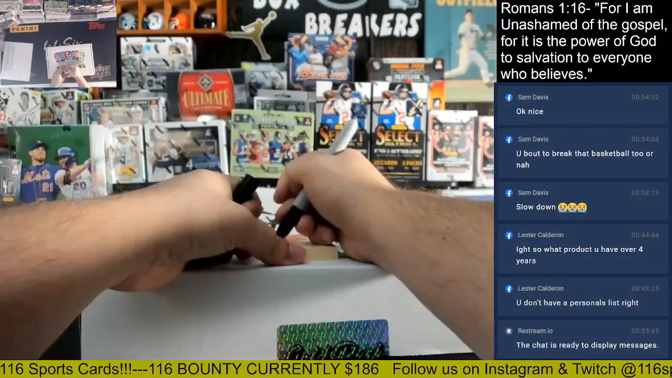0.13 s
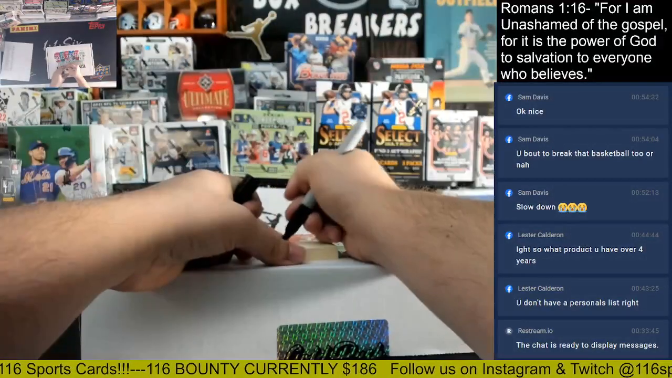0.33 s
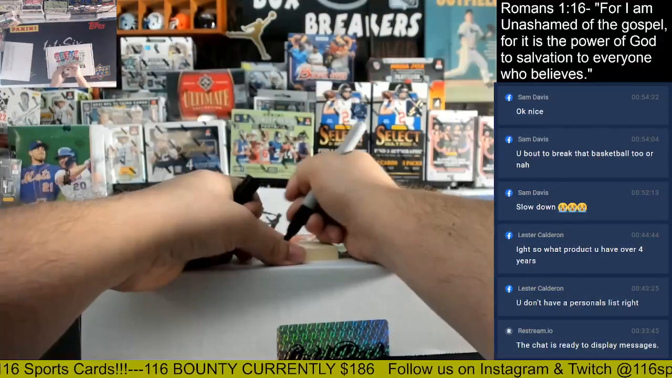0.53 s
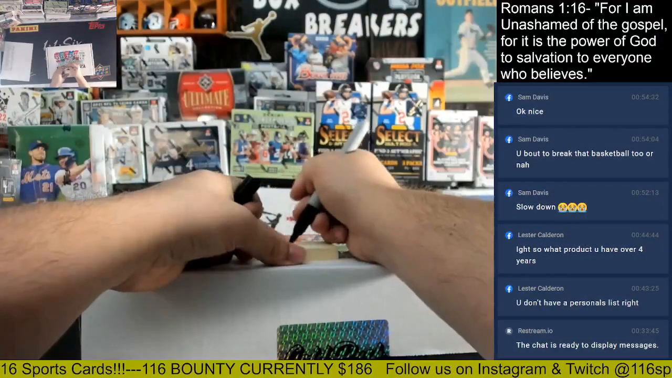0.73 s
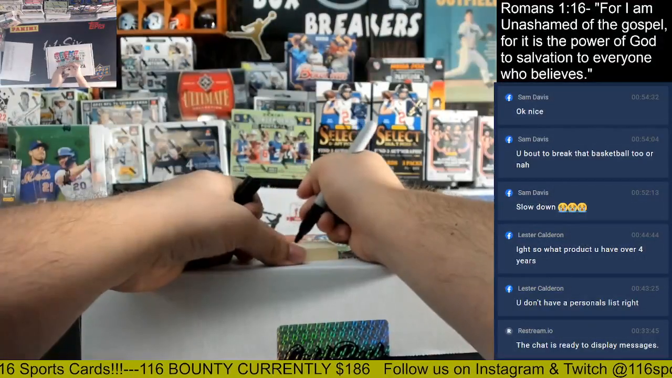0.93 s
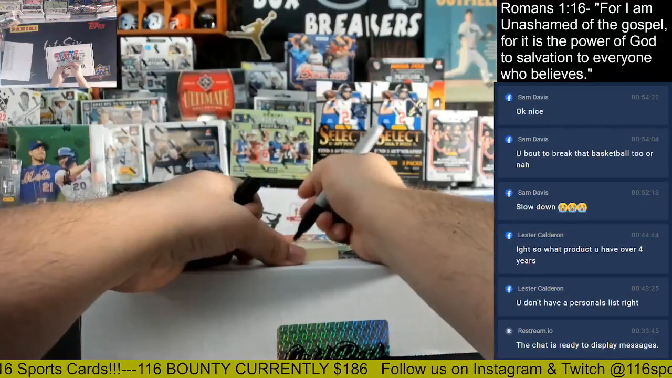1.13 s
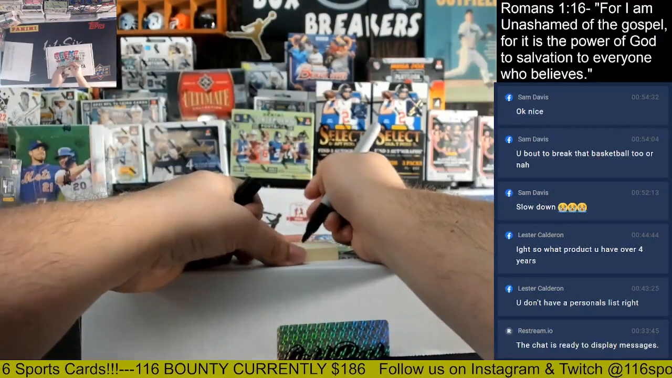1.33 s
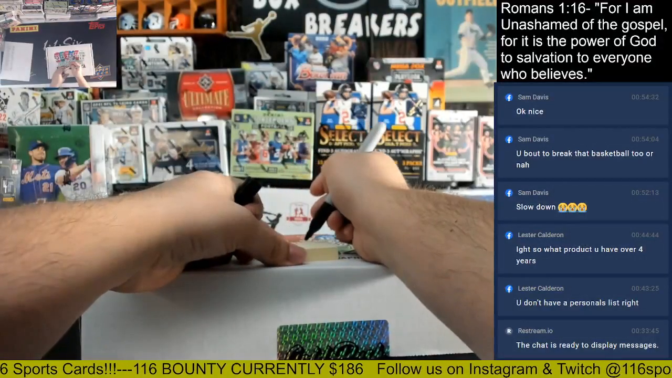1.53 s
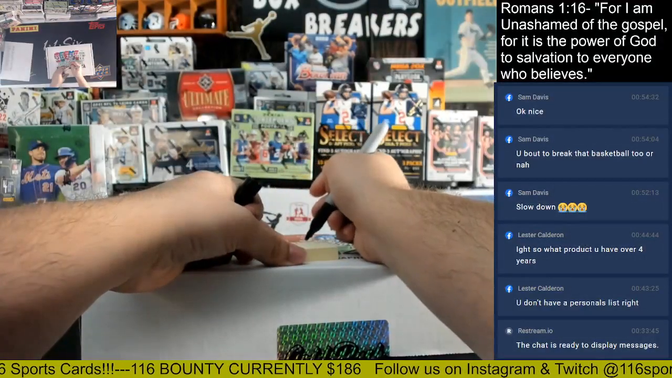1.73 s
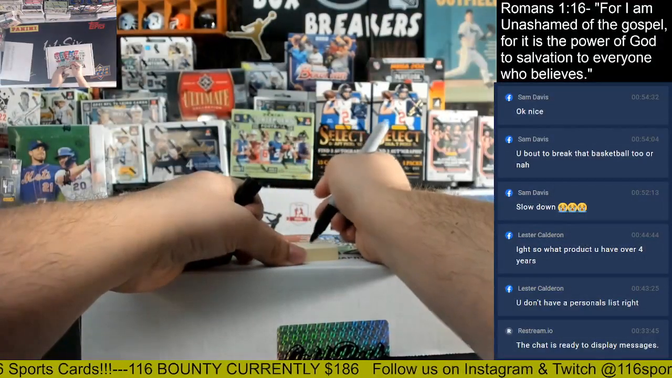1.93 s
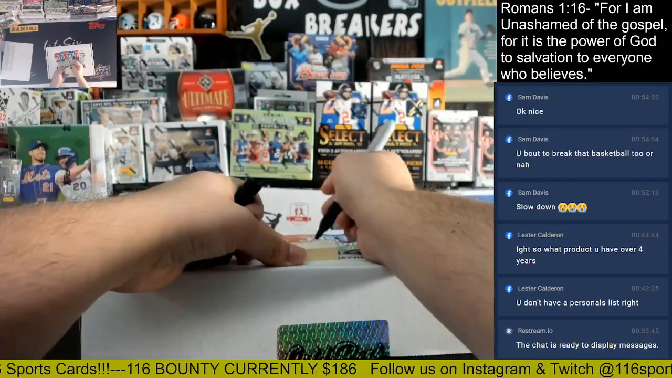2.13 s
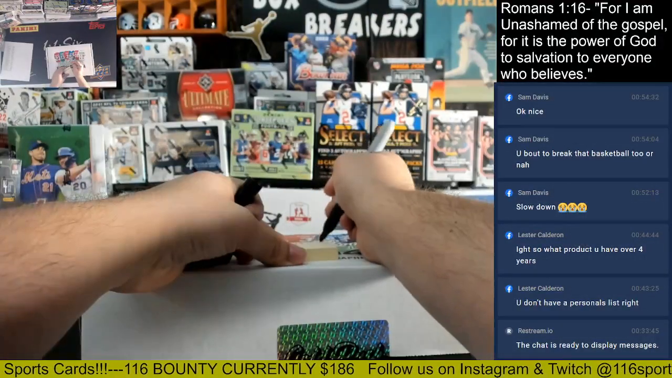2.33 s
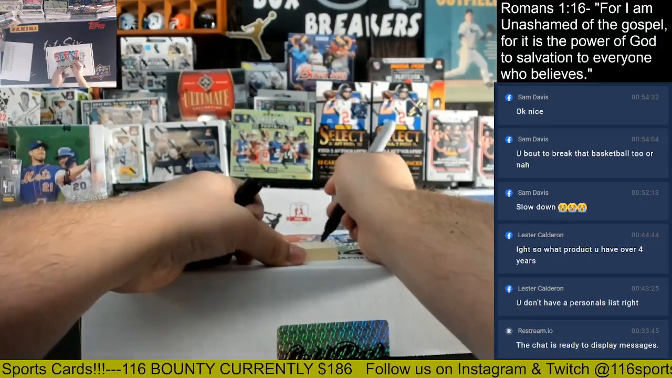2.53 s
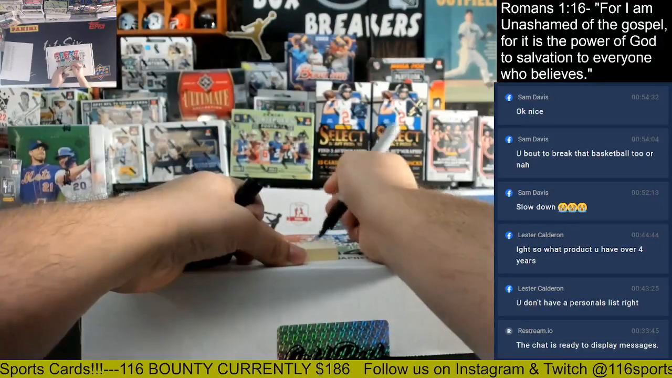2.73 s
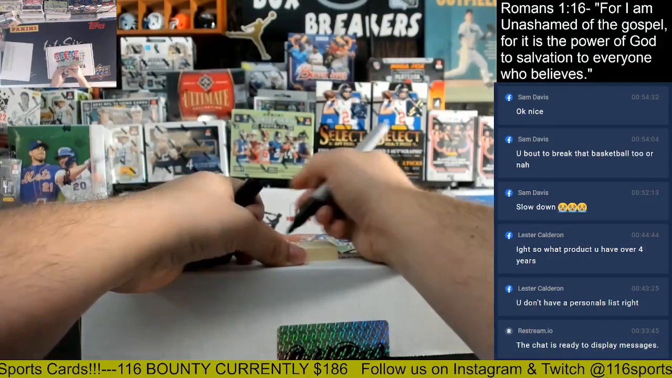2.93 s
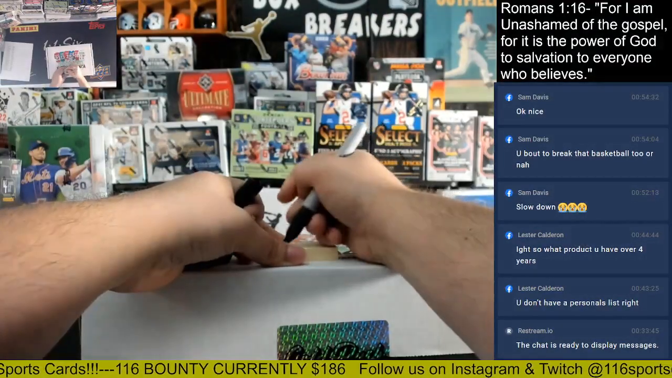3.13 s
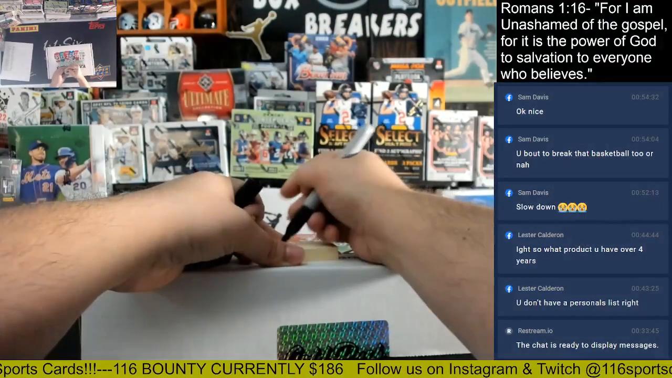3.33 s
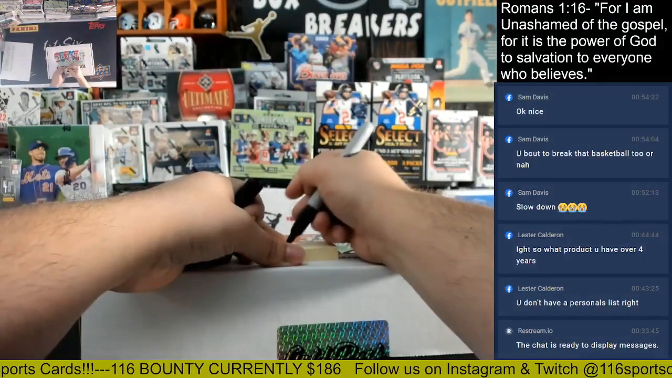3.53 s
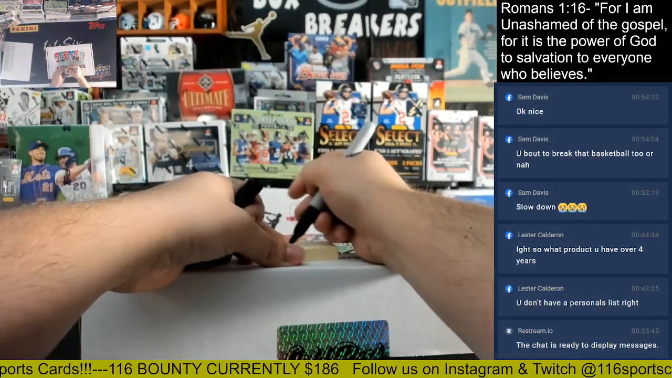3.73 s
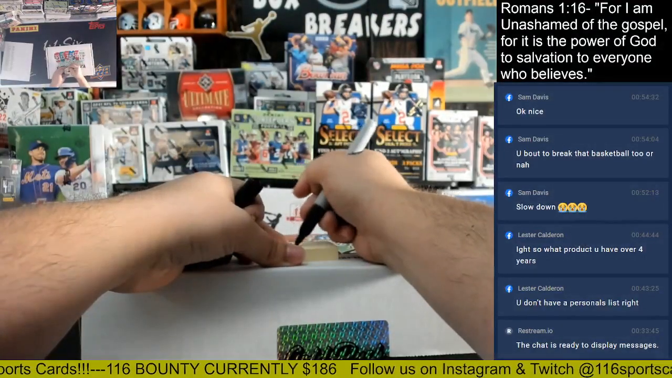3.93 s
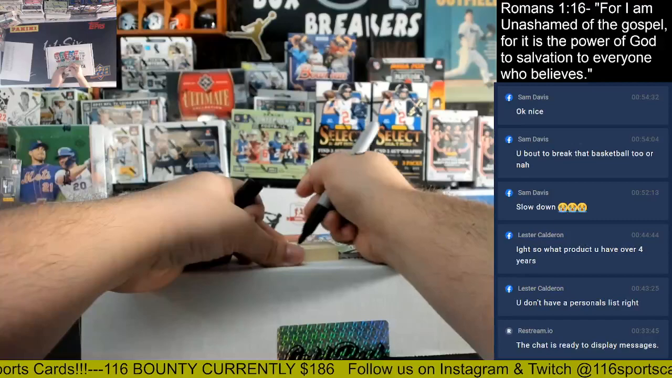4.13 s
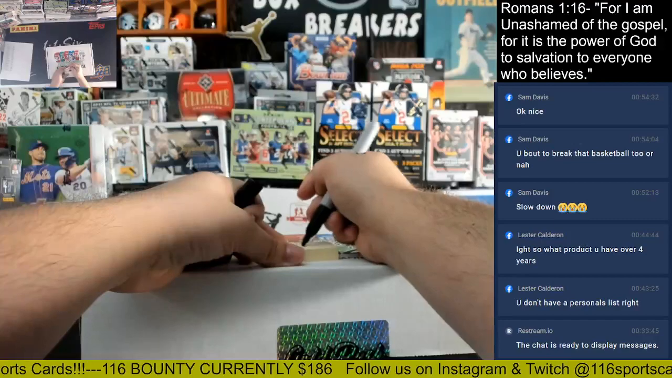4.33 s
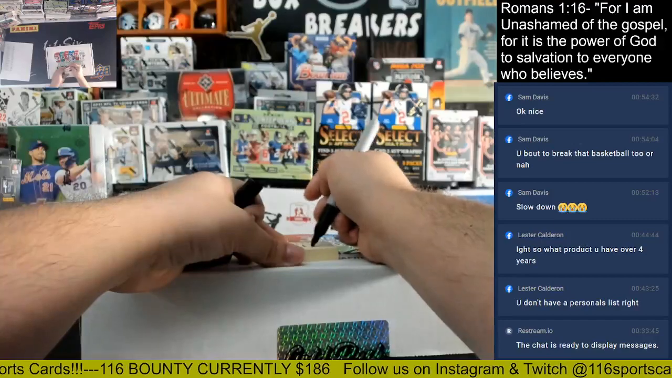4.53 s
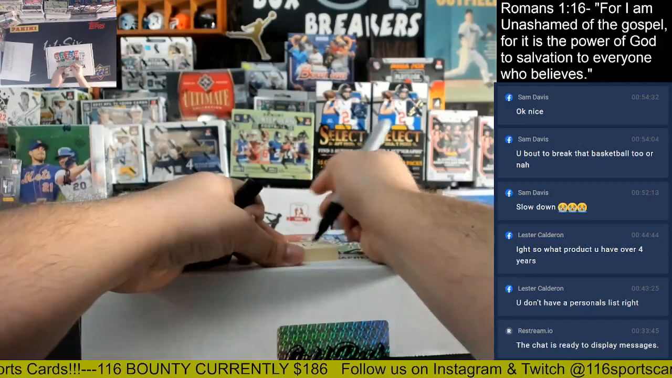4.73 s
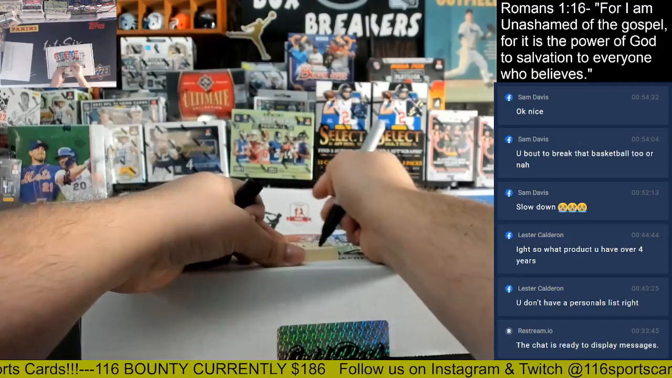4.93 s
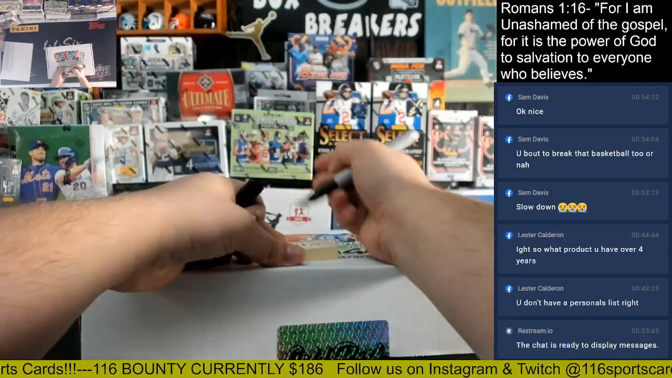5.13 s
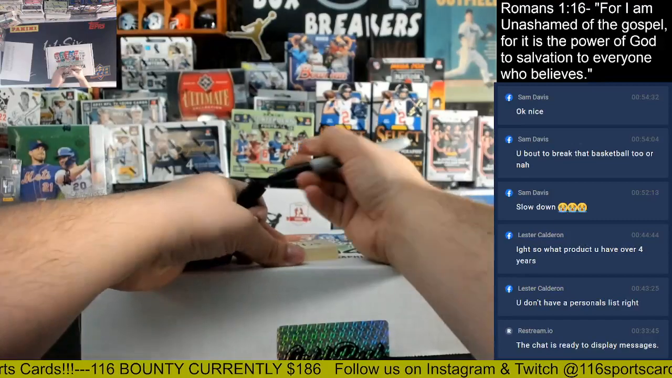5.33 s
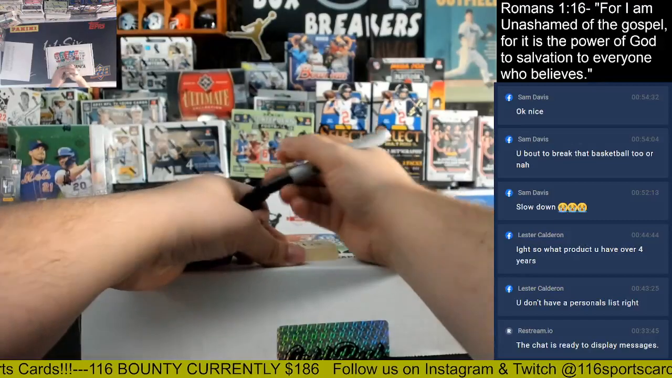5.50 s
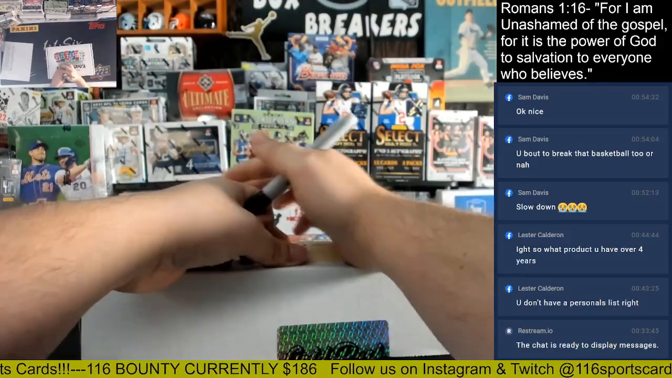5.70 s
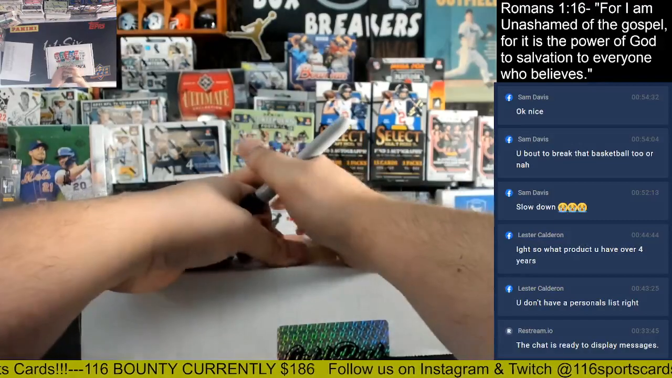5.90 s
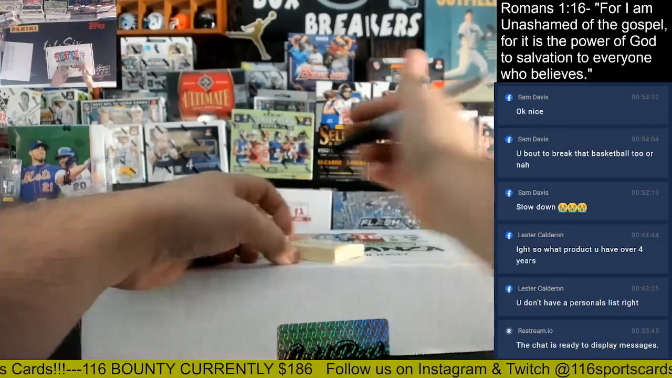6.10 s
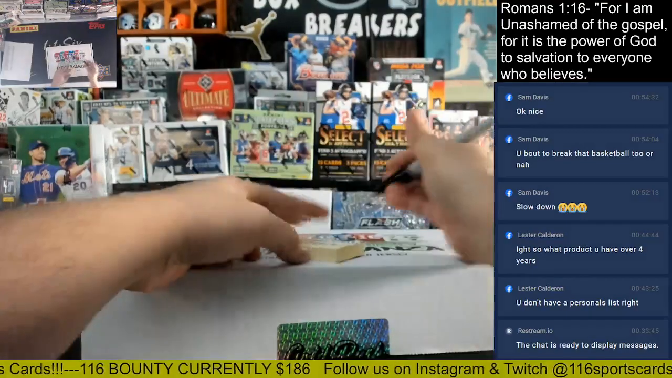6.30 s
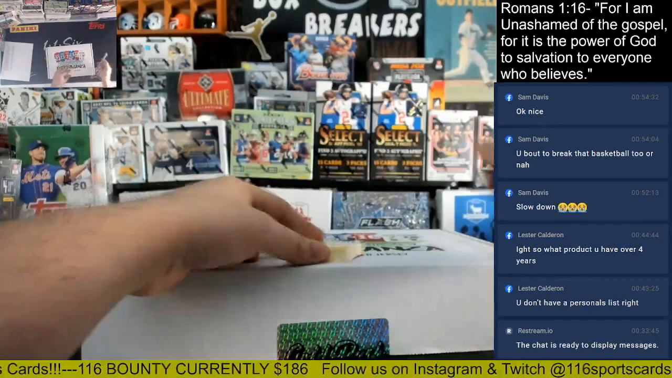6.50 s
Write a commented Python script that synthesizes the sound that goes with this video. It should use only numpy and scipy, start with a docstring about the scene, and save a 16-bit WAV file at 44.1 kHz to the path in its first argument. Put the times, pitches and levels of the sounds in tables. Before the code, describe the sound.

A small, quiet room with low room tone and a faint deep stir from arms leaning on a cardboard box; the microphone is close and the sound dry. From 0 to 2.6 s a felt-tip marker makes short, soft strokes on a card, each a bright hiss with a papery rasp, about a tenth of a second long, with small gaps. Dull taps ring the hollow lid between them, clearest near 1.0, 1.3 and 1.6 s. After a short pause, firmer and raspier strokes run from 2.9 to 4.4 s, with a last quick cluster at 4.7 to 4.9 s. Soft skin rubbing follows. At 5.5 s the plastic cap snaps on in a quick run of clicks with a deep box thump. The card slides audibly at 5.8 s with another bump, drops with the loudest hollow knock at about 5.96 s, then faint pushing and rubbing fade to 6.5 s.

```python
"""In a small room, a felt-tip marker writes in short strokes on a card that lies on a cardboard box.
Soft taps ring the box lid among the strokes; later the cap snaps on, and the card slides, drops and is pushed.
Friction is random slips, coloured by spectra or resonances; blows are sums of decaying modes and noise snaps.
Room tone, a low murmur and a deep sway lie below; one near echo and a short room tail surround the sounds."""
import sys
import numpy as np
from scipy import signal
from scipy.fft import rfft, irfft
from scipy.io import wavfile
from scipy.ndimage import uniform_filter1d, map_coordinates

SR = 44100
rng = np.random.default_rng(int(sys.argv[2]) if len(sys.argv) > 2 else 0)


def store_wav(level_fs):
    """Save 16-bit WAV to argv[1]."""
    pcm = np.round(np.clip(np.atleast_2d(level_fs), -1, 1) * 32767)
    wavfile.write(sys.argv[1], SR, pcm.T.astype(np.int16))


N = 289251


def amp(db):
    """Decibel law: 20 dB is a factor of ten in amplitude."""
    return 10 ** (np.asarray(db) / 20)


def read(points, hz):
    """Interpolation in log frequency: straight lines join the points of a table."""
    f, value = np.transpose(points)
    return np.interp(np.log(hz + 1), np.log(f + 1), value)


def add(mix, start_s, sound):
    """Superposition: a sound adds to the mix, in place, from its start time."""
    part = mix[max(round(start_s * SR), 0):][:len(sound)]
    part += sound[:len(part)]


def evened(x):
    """Normalisation of power: scales to rms 1."""
    return x / np.sqrt(np.mean(x ** 2) + 1e-20)


def peaked(x, db):
    """Normalisation of amplitude: scales to a peak level."""
    return amp(db) * x / abs(x).max()


def passed(x, hz, kind, order=2):
    """Causal Butterworth filtering, low-pass or high-pass."""
    sos = signal.butter(order, min(hz, SR / 2 - 1), kind, fs=SR, output="sos")
    return signal.sosfilt(sos, x)


def coloured(x, spectrum):
    """Spectral shaping: multiplies the Fourier transform by a gain curve, then scales to rms 1."""
    gain = amp(read(spectrum, np.fft.rfftfreq(len(x), 1 / SR)))
    return evened(irfft(rfft(x) * gain, len(x)))


def wander(size):
    """Smoothed random process: noise of rms 1 that changes over about size samples."""
    smooth = uniform_filter1d(rng.standard_normal(N), size)
    return evened(uniform_filter1d(smooth, size // 2))


def friction(slips_per_s, slip_share, flutter_db):
    """Stick-slip friction: countless tiny slips, some larger ones, and a grip that varies."""
    large_slips = rng.standard_normal(N) * (rng.random(N) < slips_per_s / SR)
    slips = rng.standard_normal(N) + slip_share * evened(large_slips)
    grip = amp(flutter_db * wander(size=220))  # changes every few milliseconds
    return evened(slips * grip)


def contact(moves):
    """Contact envelope: each sliding move fades in, swells or ebbs evenly in dB, and fades out."""
    fade_s = .009
    gain = np.zeros(N)
    for start_s, length_s, level_db, swell_db in moves:
        t = np.arange(0, length_s + fade_s, 1 / SR)
        swell = amp(level_db + swell_db * (t / t[-1] - .5))
        fades = signal.windows.tukey(len(t), 2 * fade_s / t[-1])
        add(gain, start_s - fade_s / 2, swell * fades)
    return gain


def ring(modes, rise_s):
    """Modal synthesis: a sum of dying sines that swells up while the blow spreads."""
    t = np.arange(SR // 2) / SR
    dying = sum(amp(db - 60 * t / t60) * np.sin(2 * np.pi * hz * t) for hz, db, t60 in modes)
    return np.minimum(t / rise_s, 1) * dying


def snap(spectrum, t60, rise_s=0.00051):
    """High modal density: many close modes merge into a dry noise crack that dies fast."""
    t = np.arange(SR // 4) / SR
    noise = coloured(rng.standard_normal(len(t)), spectrum)
    return noise * np.minimum(t / rise_s, 1) * amp(-60 * t / t60)


# low spectrum of the box's murmur: pitch_hz [Hz], relative density_db [dB per Hz]
MURMUR_SPECTRUM = [(50, -23), (100, -4.5), (180, 1.5), (300, -11), (450, -18.5), (900, -21), (3000, -65)]


def murmur(source):
    """Low-frequency radiation of the box: a source takes on the murmur spectrum, at rms 1."""
    return coloured(source, MURMUR_SPECTRUM)


# spectrum of the steady room tone: pitch_hz [Hz], relative density_db [dB per Hz]
ROOM_TONE_SPECTRUM = [(24, -50), (40, -6.5), (69, -7), (166, -9), (260, -11.5), (461, -24), (670, -26.5),
                      (1080, -28.5), (1350, -33.5), (1770, -29), (2270, -35), (2570, -31.5), (4130, -36.5),
                      (13300, -38.5), (15500, -40.5)]
# spectrum of the desk's deep sway: pitch_hz [Hz], relative density_db [dB per Hz]
SWAY_SPECTRUM = [(8, -6), (21, 5), (33, -13.5), (60, -27.5), (150, -44), (600, -110)]
# course of the desk's sway under the arms, about which it shifts: time_s [s], level_db [dB]
SWAY_COURSE = [(0.0, -59), (0.84, -63), (0.91, -77), (1.06, -51), (1.11, -71), (1.18, -52), (1.26, -65.5),
               (1.88, -57.5), (1.93, -67), (3.03, -61.5), (3.08, -66), (3.34, -49), (4.05, -65.5),
               (4.1, -52.5), (5.31, -65), (5.53, -55), (6.49, -59), (6.55, -65)]


def background(tone_db=-69, murmur_db=-70.5, shift_db=2):
    """Stationary noise and slow modulation: room tone, and the low stir of hands that lean on the box."""
    tone = amp(tone_db) * coloured(rng.standard_normal(N), ROOM_TONE_SPECTRUM)
    stir = amp(murmur_db) * murmur(rng.standard_normal(N))
    sway_db = np.interp(np.arange(N) / SR, *np.transpose(SWAY_COURSE))
    desk = coloured(rng.standard_normal(N), SWAY_SPECTRUM) * amp(sway_db)
    weight = amp(shift_db * wander(size=3000))  # the weight of the arms keeps shifting
    return tone + (stir + desk) * weight


# decay time of the room by band: pitch_hz [Hz], t60_s [s]
ROOM_T60 = [(150, 0.23), (1000, 0.061), (5000, 0.14), (15000, 0.18)]


def room(x):
    """Reverberation: sparse reflections of random sign, each band dying at its own speed."""
    size = SR // 2
    present = rng.random(size) < 2500 / SR  # about 2500 reflections per second
    late = np.arange(size) > .004 * SR  # none in the first 4 ms
    reflections = rng.choice([-1., 1.], size) * present * late
    hz, t, bands = signal.stft(reflections, SR, nperseg=256)
    decay = amp(-60 * t / read(ROOM_T60, hz)[:, None])
    tail = signal.istft(bands * decay, SR, nperseg=256)[1]
    return signal.fftconvolve(x, tail / np.linalg.norm(tail))[:N]


# spectrum of skin and card on the lid: pitch_hz [Hz], relative density_db [dB per Hz]
SKIN_SPECTRUM = [(210, -24), (350, -3.5), (473, -12.5), (619, -7), (981, -4), (1350, -12.5), (1480, -8.5),
                 (2500, -8.5), (3170, -10), (3660, -9), (4220, -13), (7360, -14), (15500, -22.5)]
# skin and card slide over the lid:
# start_s [s], length_s [s], level_db of the rub at mid-move [dB], swell_db from start to end [dB]
SLIDES = [(1.07, 0.067, -77.5, 7), (1.435, 0.047, -74.5, 0), (1.71, 0.074, -74, -1), (2.62, 0.17, -75, 0.5),
          (3.785, 0.023, -74.5, -3), (4.575, 0.082, -72.5, 12), (4.89, .31, -74.5, 0),
          (4.938, 0.024, -71, -4), (5.412, 0.14, -73, -7), (5.61, .17, -70, 10), (5.78, 0.096, -58.5, 1),
          (5.88, 0.077, -61.5, -14), (6.111, 0.022, -73, -10), (6.152, 0.092, -68, -5),
          (6.25, 0.3, -70, -1), (6.472, 0.033, -73.5, -4)]


def slides(murmur_db=0):
    """Sliding friction: a soft, dull rub of skin and card on the lid, with a low murmur of the box."""
    rub = coloured(friction(slips_per_s=830, slip_share=0.41, flutter_db=0.5), SKIN_SPECTRUM)
    return (rub + amp(murmur_db) * murmur(rng.standard_normal(N))) * contact(SLIDES)


# modes of the lid under the card, before filtering: pitch_hz [Hz], relative level_db [dB], t60_s [s]
LID_MODES = [(184, -10.5, 0.18), (257, 3.5, 0.12), (284.5, 2, 0.09), (329.6, 4, 0.057), (395, -4, 0.081),
             (587, -5.5, 0.058), (643, -5, 0.088), (748, -1.5, 0.052), (806, -8.5, 0.035),
             (830, -2.5, 0.011), (920, -14.5, 0.067), (1025, -28, .06), (1120, -28, .05),
             (1133, -10.5, 0.07), (1334, -17, 0.057), (1430, -20, 0.047), (1630, -25.5, 0.054),
             (2057, -19, 0.067), (2140, -26, 0.068), (2530, -18, 0.079), (2880, -26, .07)]


def lid_answer(rise_s=0.00062, low_hz=150, gap_hz=505, gap_width_hz=110):
    """Panel radiation: a small lid radiates no deep bass, and between two groups its modes cancel."""
    sound = passed(ring(LID_MODES, rise_s), low_hz, "high", order=4)
    return signal.lfilter(*signal.iirnotch(gap_hz, gap_hz / gap_width_hz, SR), sound)


# the side of the writing hand drags on the lid:
# start_s [s], length_s [s], level_db of the growl at mid-move [dB], swell_db from start to end [dB]
DRAGS = [(.29, .15, -69, -5), (2.372, .15, -62.5, 4), (3.56, .16, -68.5, 2), (3.836, 0.042, -65, -10),
         (3.918, .06, -67, 3), (4.108, 0.055, -65.5, -10), (4.22, 0.077, -69.5, 2), (4.8, .045, -63.5, -2),
         (5.43, .08, -71, 0)]


def drags(low_hz=420, murmur_db=-4):
    """Coarse stick-slip: grains of skin friction make the lid growl and the box murmur under it."""
    grains = friction(slips_per_s=280, slip_share=0.66, flutter_db=3.0)
    growl = signal.fftconvolve(grains, lid_answer())[:N]
    growl = evened(passed(growl, low_hz, "high"))
    return (growl + amp(murmur_db) * murmur(grains)) * contact(DRAGS)


# deep modes of the whole box and its air: pitch_hz [Hz], relative level_db [dB], t60_s [s]
BOX_MODES = [(69, -11.5, 0.22), (104.6, -4, 0.13), (166.8, 2.5, 0.21), (261, -13, 0.06), (391, -14, 0.069)]


def box_answer(push_s):
    """Modes of an enclosure: the deep ring of box and air swells up over the push."""
    return ring(BOX_MODES, push_s)


# the hands bump the box: start_s [s], peak_db [dB], push_s length of the push [s]
THUMPS = [(2.512, -45, 0.0077), (5.549, -20.5, 0.018), (5.812, -31, 0.015), (6.042, -36.5, 0.013)]


def thumps(low_hz=55):
    """Slow excitation: a fleshy push lets the deep ring of the box swell up."""
    out = np.zeros(N)
    for start_s, peak_db, push_s in THUMPS:
        add(out, start_s, peaked(passed(box_answer(push_s), low_hz, "high"), peak_db))
    return out


# soft taps of nib, finger or hand that ring the lid: start_s [s], peak_db of the lid's ring [dB]
TAPS = [(0.002, -51.5), (0.213, -50.5), (0.297, -51), (0.522, -50), (0.56, -51), (0.617, -48), (0.807, -53),
        (0.842, -47.5), (0.9995, -39), (1.131, -45.5), (1.298, -40.5), (1.478, -49), (1.6425, -36.5),
        (1.682, -47), (1.785, -42.5), (1.867, -48.5), (2.072, -52), (2.337, -48), (2.933, -53.5),
        (3.137, -49), (3.327, -47), (3.522, -55), (3.872, -48.5), (4.09, -50.5), (4.123, -53), (4.375, -55),
        (5.526, -43.5), (5.547, -32), (6.202, -42)]


def taps(soft_hz=480, push_db=-17, push_s=.012):
    """Soft impact: a yielding nib, finger or hand rings the low modes of the lid and nudges the box."""
    out = np.zeros(N)
    tap = passed(lid_answer(), soft_hz, "low")
    nudge = passed(box_answer(push_s), 112, "low", order=4)
    for start_s, peak_db in TAPS:
        add(out, start_s, peaked(tap, peak_db))
        add(out, start_s, peaked(nudge, peak_db + push_db))
    return out


# spectrum of the crack of card on lid: pitch_hz [Hz], relative density_db [dB per Hz]
CRACK_SPECTRUM = [(150, -46), (480, -25), (620, 17), (900, 10.5), (1400, 0.5), (2200, -4.5), (3500, -11),
                  (6500, -17), (8000, -22.5), (15000, -35)]


def crack(t60):
    """Impact noise: card on lid gives a dry burst of dense modes."""
    return snap(CRACK_SPECTRUM, t60)


# the card's edge flicks against the lid: start_s [s], peak_db of the lid's ring [dB]
TICKS = [(0.95, -47.5), (1.618, -47), (1.864, -48), (2.658, -49.5), (3.551, -55), (4.536, -60.5),
         (4.81, -54), (5.922, -61)]


def ticks(low_hz=620, top_hz=3500, crack_db=-9, crack_t60=0.043):
    """Brief impact: a flick of the card's edge excites mostly the high modes of the lid."""
    out = np.zeros(N)
    flick = passed(passed(lid_answer(), low_hz, "high"), top_hz, "low")
    for start_s, peak_db in TICKS:
        add(out, start_s, peaked(flick, peak_db))
        add(out, start_s, amp(peak_db + crack_db) * passed(crack(crack_t60), top_hz, "low"))
    return out


# the card drops flat on the lid: start_s [s], peak_db of the lid's ring [dB], top_hz low-pass corner [Hz]
KNOCK = (5.9622, -12.5, 1500)


def knock(crack_db=-32, crack_t60=0.12):
    """Broad impact: the falling card rings the lid up to the limit of the contact, and cracks."""
    out = np.zeros(N)
    start_s, peak_db, top_hz = KNOCK
    add(out, start_s, peaked(passed(lid_answer(), top_hz, "low"), peak_db))
    add(out, start_s, amp(crack_db) * crack(crack_t60))
    return out


# spectrum of the cap's snaps: pitch_hz [Hz], relative density_db [dB per Hz]
CAP_SPECTRUM = [(200, -21), (450, -7), (750, -6), (1050, 0), (1400, -6.5), (2500, -5.5), (3500, -7),
                (5500, -13.5), (9500, -12.5), (11500, -25), (15500, -27)]
# the cap scrapes over its ridge and seats:
# start_s [s], level_db of the snap before its decay [dB], t60_s of the snap [s], pitch_hz of the ring [Hz]
CAP_SNAPS = [(5.519, -44.5, 0.036, 730), (5.526, -43.5, 0.057, 914), (5.533, -51, 0.18, 1100),
             (5.554, -48.5, 0.069, 780)]


def cap(ring_db=-4, ring_t60=0.046):
    """Cavity resonance: with a quick run of dry plastic snaps, the hollow cap rings at several pitches."""
    out = np.zeros(N)
    for start_s, level_db, t60_s, pitch_hz in CAP_SNAPS:
        add(out, start_s, amp(level_db) * snap(CAP_SPECTRUM, t60_s, rise_s=.0015))
        add(out, start_s, ring([(pitch_hz, level_db + ring_db, ring_t60)], rise_s=.001))
    return out


def resonances(drag, modes, place_db):
    """Driven resonance: slips shake modes that wax and wane as the nib travels over the card."""
    shaken = np.zeros(N)
    for hz, width_hz, db in modes:
        mode = signal.lfilter(*signal.iirpeak(hz, hz / width_hz, SR), drag)
        shaken += amp(db + place_db * wander(size=5000)) * mode
    return evened(passed(shaken, 8800, "low"))


def sweep(rise_s, fall_s, power):
    """Power law of speed: the nib speeds up, then slows and lifts, each along a quarter sine."""
    lift_power = 2.37  # a faster fade as the pen slows and lifts
    t = np.arange(0, rise_s + fall_s, 1 / SR)
    speed = np.sin(np.pi / 2 * np.interp(t, [0, rise_s, rise_s + fall_s], [0, 1, 0]))
    return speed ** np.where(t < rise_s, power, lift_power)


# spectrum of the nib's hiss: pitch_hz [Hz], relative density_db [dB per Hz]
NIB_SPECTRUM = [(300, -22), (1200, -37), (2500, -2), (3600, -2), (5000, -1), (6300, 0), (8000, 1.7),
                (10000, 0), (13000, -3.5), (15500, -10)]
# higher resonances of nib and pen, before the grip shift: pitch_hz [Hz], width_hz [Hz], level_db [dB]
RASP_MODES = [(1340, 91, -8), (1593, 78, -1.5), (1800, 130, 0.5), (2017, 110, -2), (2610, 150, -4.5),
              (2900, 60, -9), (3230, 75, -10), (3630, 110, -7), (4580, 180, -11.5), (6360, 60, -11)]
# resonances of card and lid under a moving nib: pitch_hz [Hz], width_hz [Hz], relative level_db [dB]
BODY_MODES = [(198, 60, 6), (282, 118, 12), (612, 87, 4), (765, 56, -8), (1050, 49, 1)]
# marker strokes: start_s [s], rise_s speeding up [s], fall_s slowing down [s], then the levels at full
# speed before the ripple and its scaling: hiss_db [dB], rasp_db [dB], card_db [dB]
STROKES = [(0.0, 0.0016, 0.034, -64.5, -78, -64), (0.032, 0.038, 0.074, -68, -71, -63),
           (0.251, 0.017, 0.14, -65, -69, -61.5), (0.335, 0.032, 0.1, -61, -77, -61.5),
           (0.522, 0.044, 0.047, -63.5, -73, -63), (0.606, 0.042, 0.06, -62, -73, -61),
           (0.808, 0.031, 0.061, -65, -73, -61.5), (1.019, 0.012, 0.046, -70, -77, -61),
           (1.137, 0.038, 0.067, -63, -76, -61.0), (1.327, 0.027, 0.057, -65, -74, -63.0),
           (1.478, 0.029, 0.05, -69, -78, -65.0), (1.682, 0.005, 0.041, -70, -77, -63.5),
           (1.808, 0.026, 0.082, -59, -69, -58.5), (1.875, 0.045, 0.045, -66.5, -73, -66.0),
           (2.071, 0.032, 0.068, -69, -76, -65), (2.131, 0.062, 0.063, -62.5, -71.5, -61),
           (2.278, 0.016, 0.041, -75, -69, -70), (2.37, 0.013, 0.14, -71, -75.5, -64),
           (2.489, 0.053, 0.056, -66, -73.5, -63), (2.945, 0.019, 0.091, -58, -64.5, -57),
           (3.158, 0.009, 0.08, -58.5, -65, -58.5), (3.351, 0.024, 0.064, -62, -68, -60.0),
           (3.549, 0.024, 0.042, -66.5, -67.5, -59.5), (3.6, 0.067, 0.13, -61, -64.0, -63.5),
           (3.832, 0.017, 0.082, -61.5, -71, -59), (3.915, 0.018, 0.11, -60.5, -68.5, -58),
           (4.098, 0.016, 0.079, -62.5, -70.5, -60.5), (4.173, 0.041, 0.11, -63.5, -70, -61),
           (4.354, 0.05, 0.056, -65, -73, -59.0), (4.68, 0.026, 0.04, -60.5, -62, -58.5),
           (4.726, 0.04, 0.07, -64.5, -66.5, -60.5), (4.796, 0.039, 0.069, -63, -62.5, -57)]


def marker(ripple=0.55, ripple_t60=0.04, grip_shift=.025):
    """Friction-driven vibration: felt drags with a bright hiss, and its slips shake pen, card and lid."""
    drag = friction(slips_per_s=1800, slip_share=0.71, flutter_db=1.1)
    hiss = coloured(drag, NIB_SPECTRUM)
    rasp = resonances(drag, RASP_MODES, place_db=1.5)
    body = resonances(drag, BODY_MODES, place_db=2.0)
    out, t = np.zeros(N), np.arange(SR // 50) / SR
    for start_s, rise_s, fall_s, hiss_db, rasp_db, card_db in STROKES:
        # the card answers as soon as the nib bites, the hiss needs speed
        hiss_gain, bite = sweep(rise_s, fall_s, power=0.94), sweep(rise_s, fall_s, power=0.38)
        at = max(round(start_s * SR), 0) + np.arange(len(bite))
        # the rasp's pitch changes with the grip, by a random share from stroke to stroke
        pitch_ratio = 1 + grip_shift * rng.standard_normal()
        gripped = map_coordinates(rasp[at], [np.arange(len(at)) * pitch_ratio], mode="mirror")
        shaken = amp(rasp_db) * gripped + amp(card_db) * body[at]
        stroke = hiss_gain * amp(hiss_db) * hiss[at] + bite * shaken
        # every stroke meets its own pattern of fine, high resonances in the card
        spot = passed(rng.standard_normal(len(t)), 1170, "high") * amp(-60 * t / ripple_t60)
        add(out, start_s, stroke)
        add(out, start_s, ripple * signal.fftconvolve(stroke, spot / np.linalg.norm(spot)))
    return out / np.sqrt(1 + ripple ** 2)


def scene(echo_s=.00277, echo_gain=0.16, rub_room_db=-10, blow_room_db=-16):
    """Comb filtering and reverberation: a near surface echoes marker, slides and cap; the room adds a tail."""
    rubbing = marker() + slides() + cap()
    echo = np.interp(np.arange(N) - echo_s * SR, np.arange(N), rubbing)
    rubbing = rubbing + echo_gain * echo
    blows = taps() + ticks() + knock() + thumps() + drags()
    wet = room(amp(rub_room_db) * rubbing + amp(blow_room_db) * blows)
    return (rubbing + blows + wet + background())[None]


def record(dry, edge_hz=15750):
    """Band limitation: a linear-phase low-pass removes the highest treble."""
    lowpass = signal.firwin(511, edge_hz, window=("kaiser", 9), fs=SR)
    return signal.oaconvolve(dry, lowpass[None], "same")


dry = scene()
out = record(dry)
store_wav(out)
```